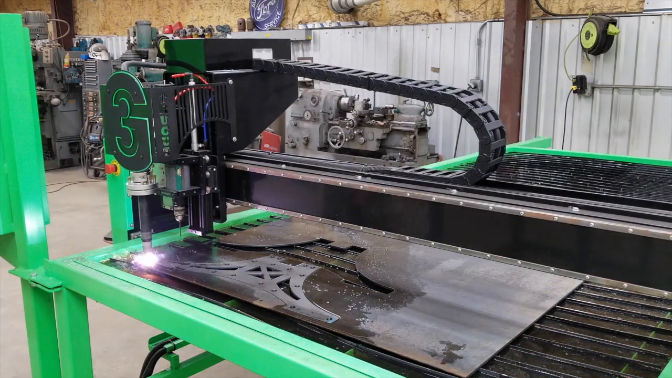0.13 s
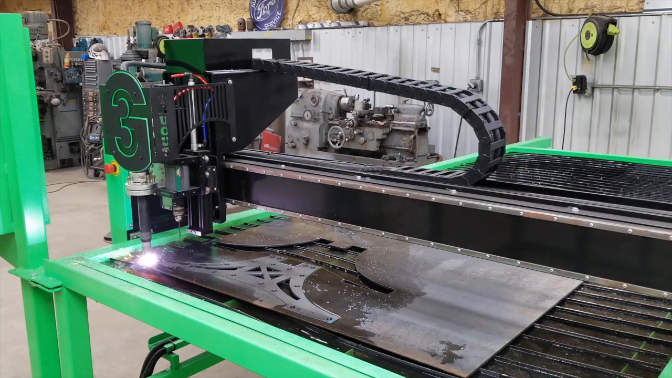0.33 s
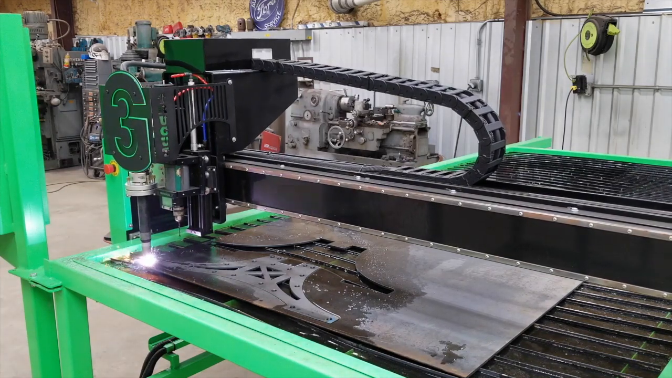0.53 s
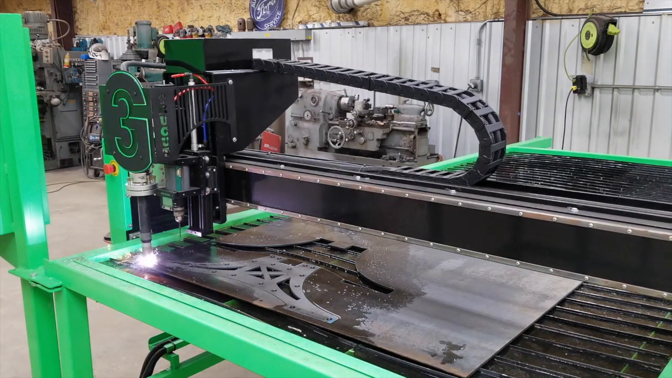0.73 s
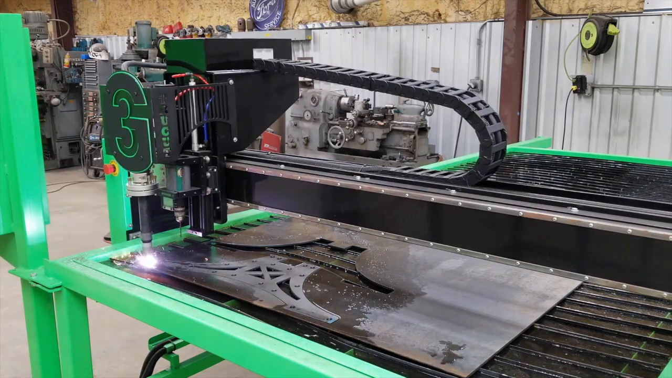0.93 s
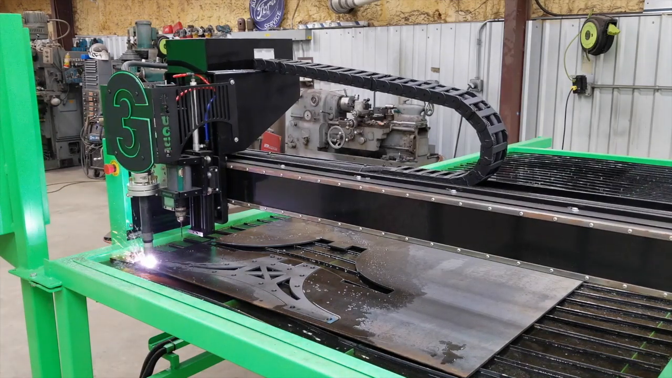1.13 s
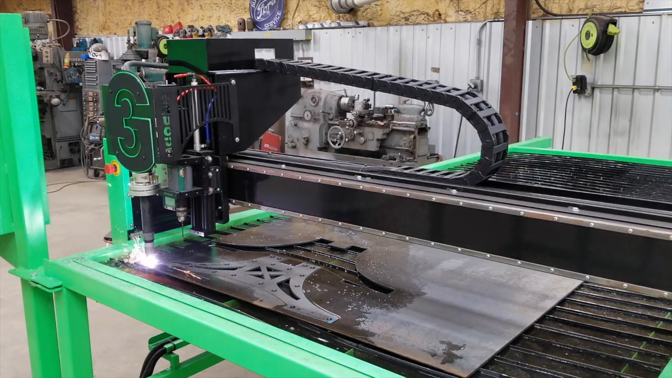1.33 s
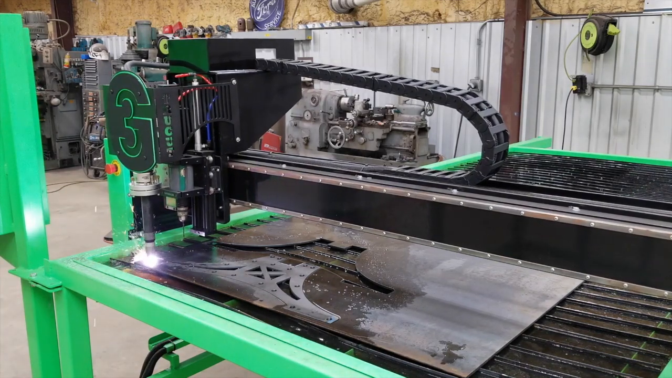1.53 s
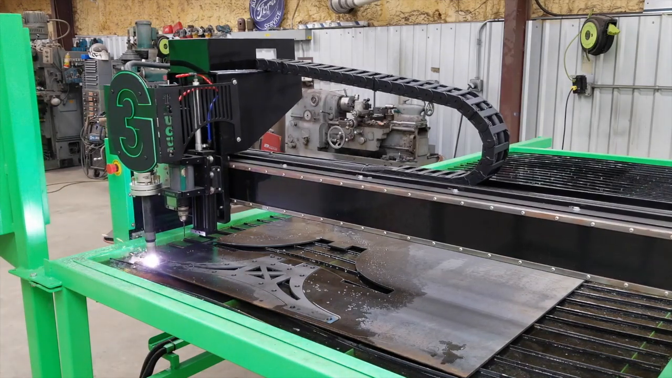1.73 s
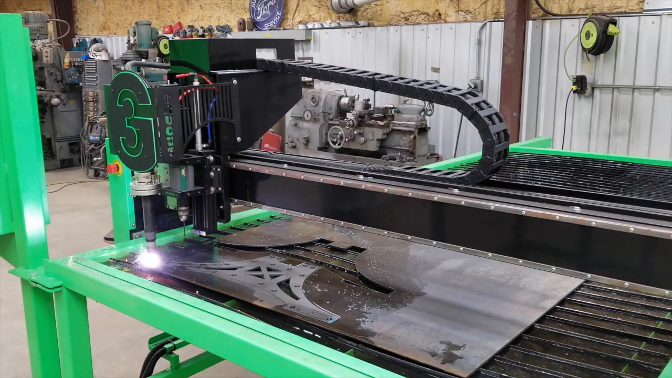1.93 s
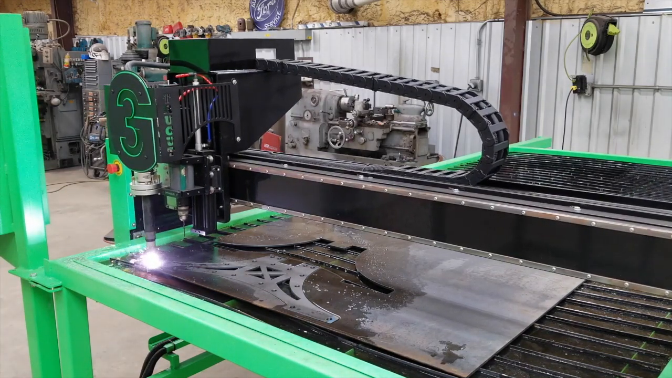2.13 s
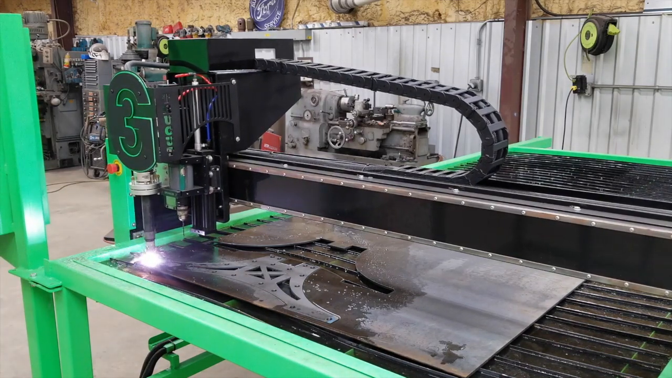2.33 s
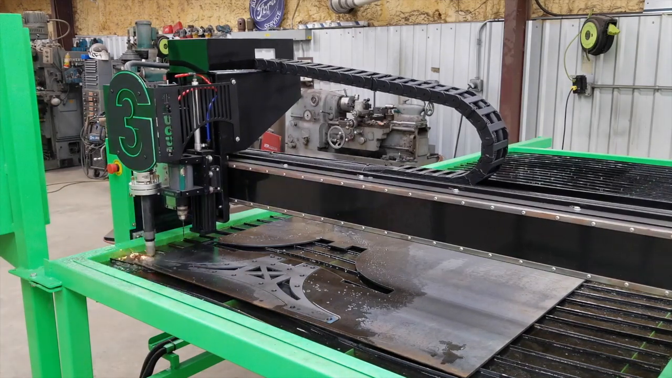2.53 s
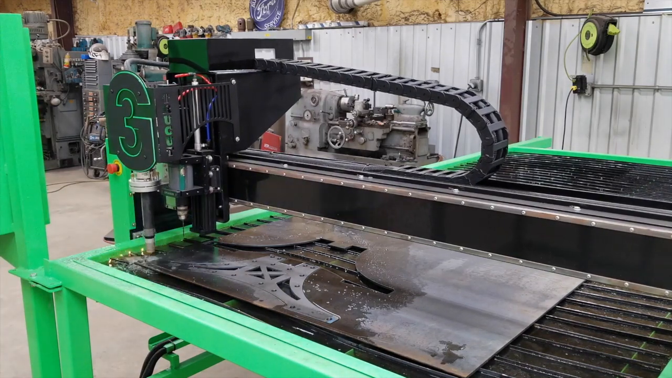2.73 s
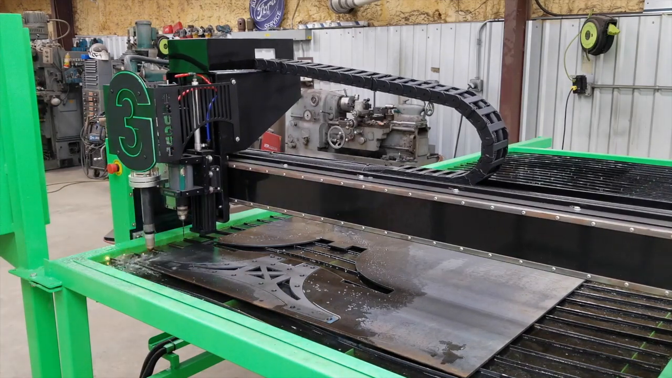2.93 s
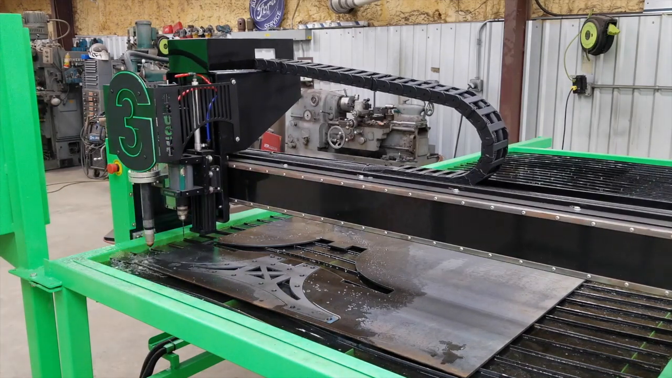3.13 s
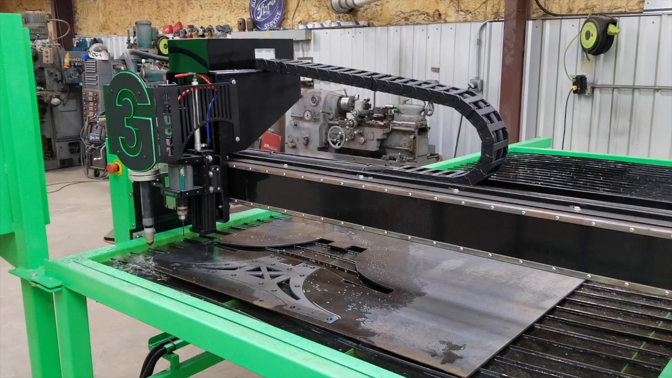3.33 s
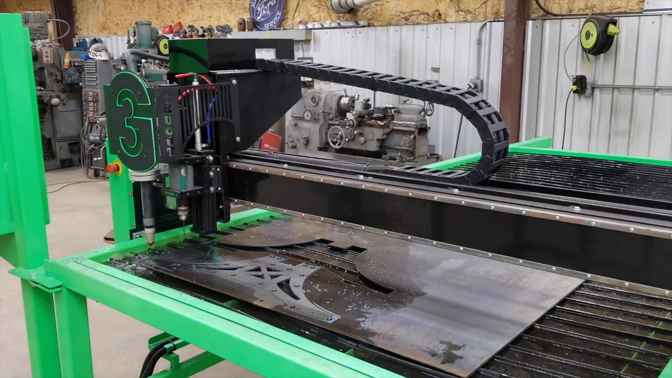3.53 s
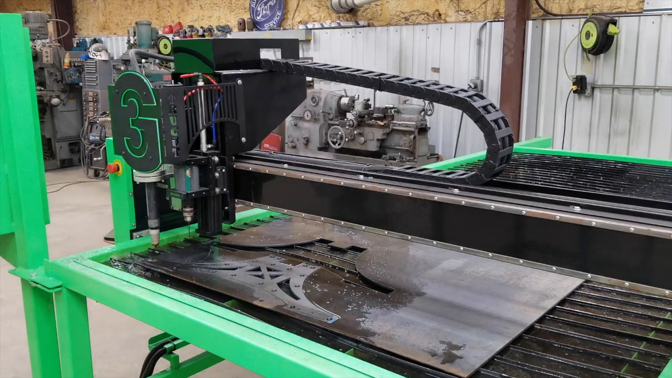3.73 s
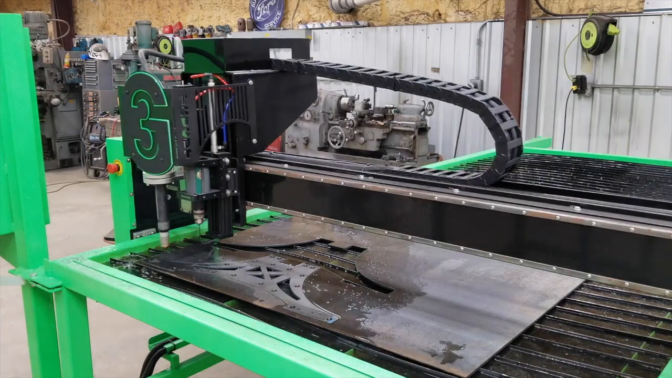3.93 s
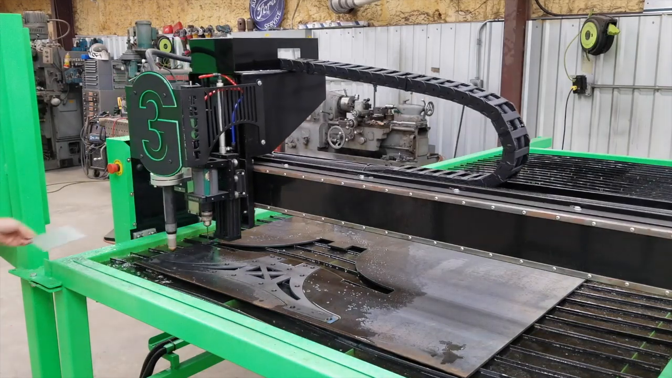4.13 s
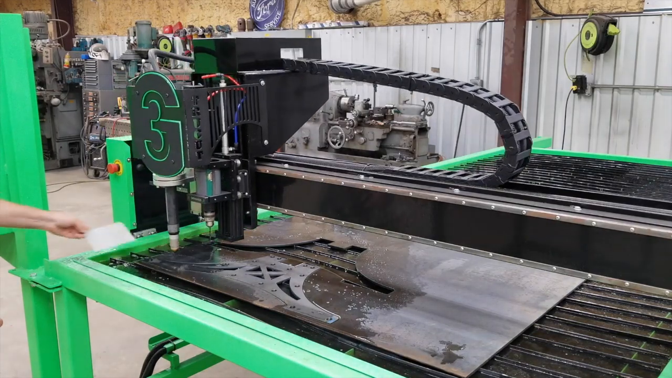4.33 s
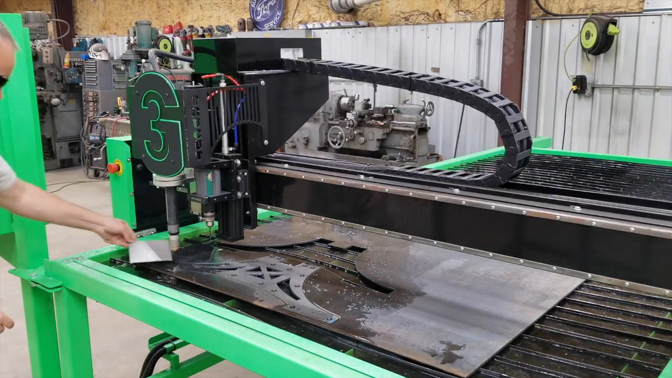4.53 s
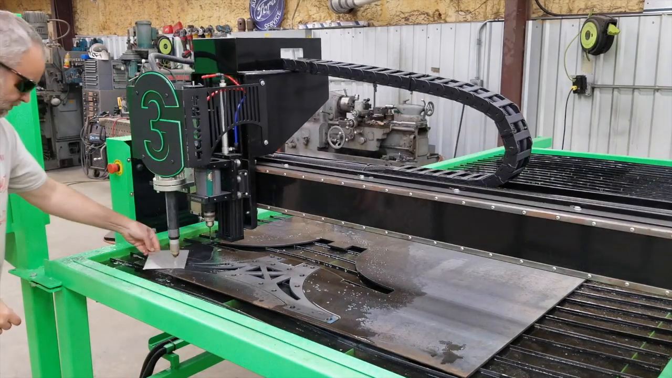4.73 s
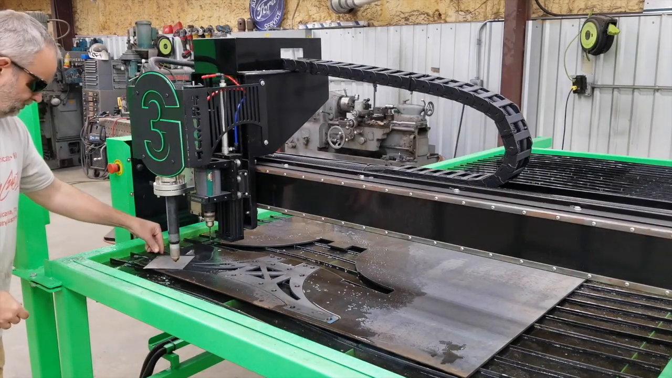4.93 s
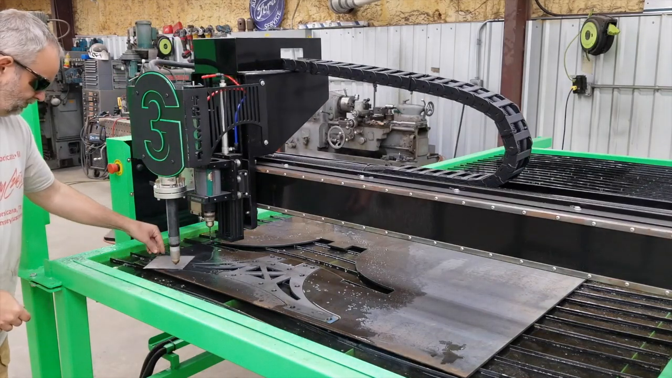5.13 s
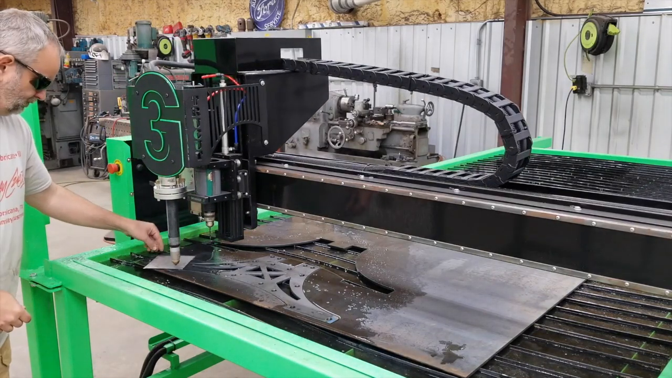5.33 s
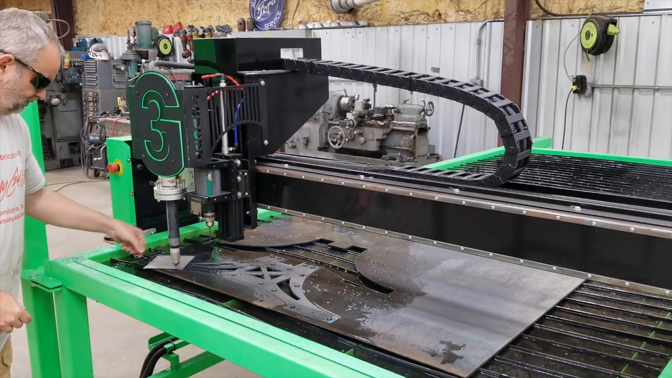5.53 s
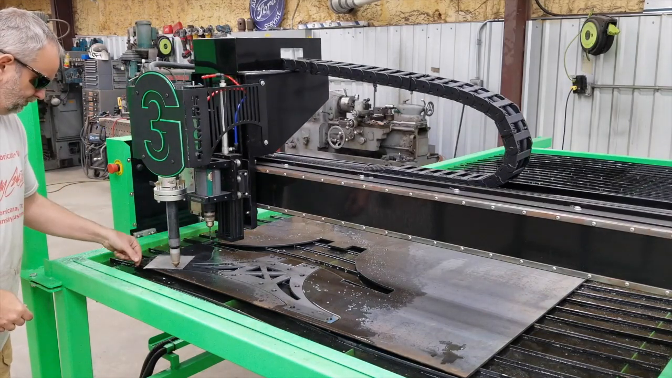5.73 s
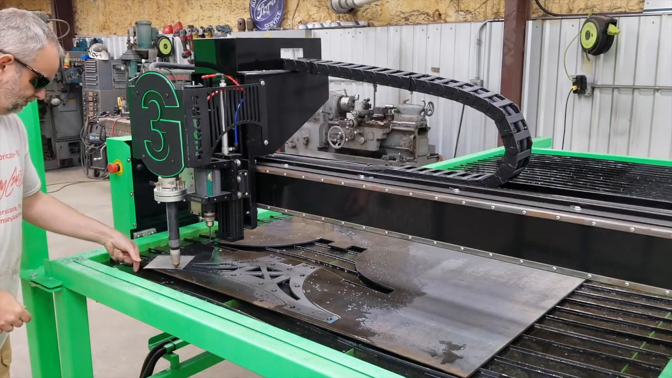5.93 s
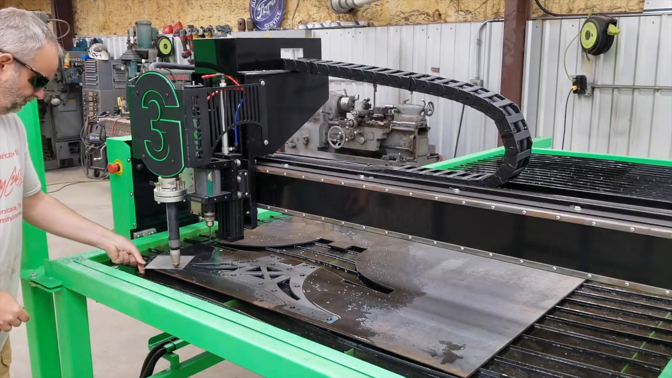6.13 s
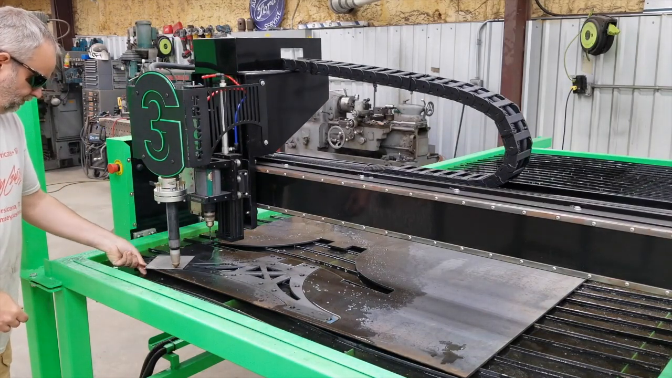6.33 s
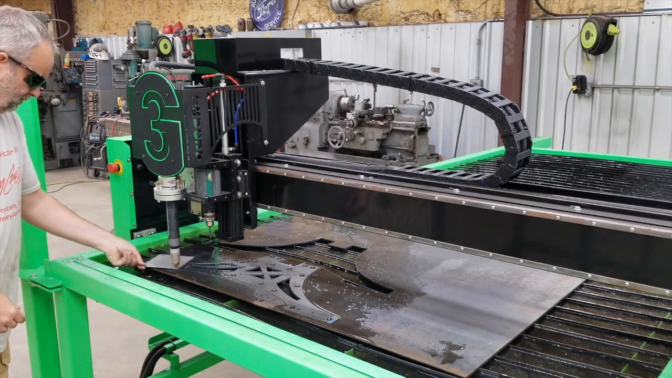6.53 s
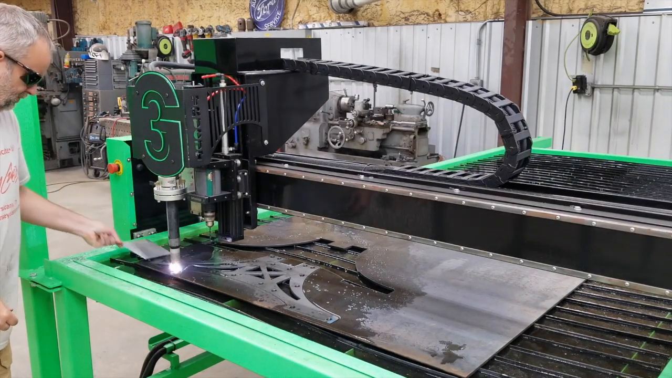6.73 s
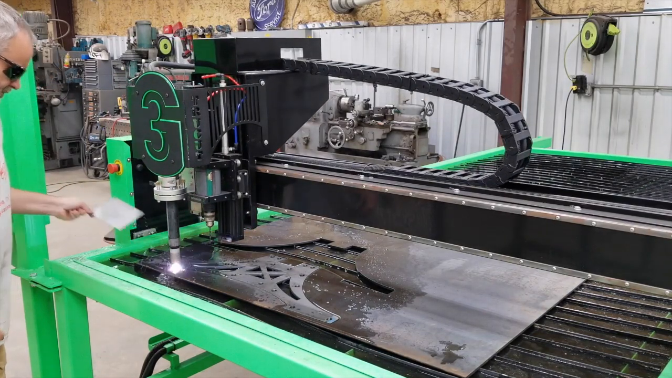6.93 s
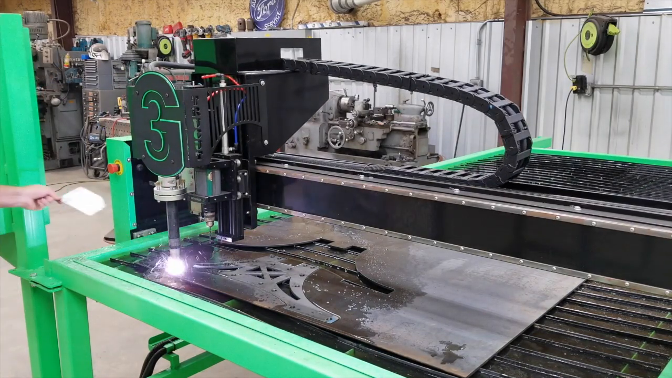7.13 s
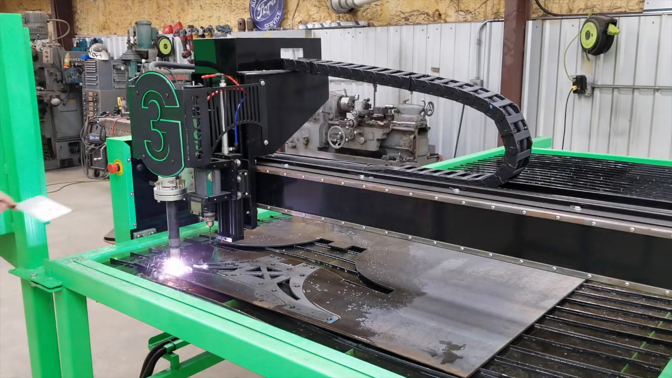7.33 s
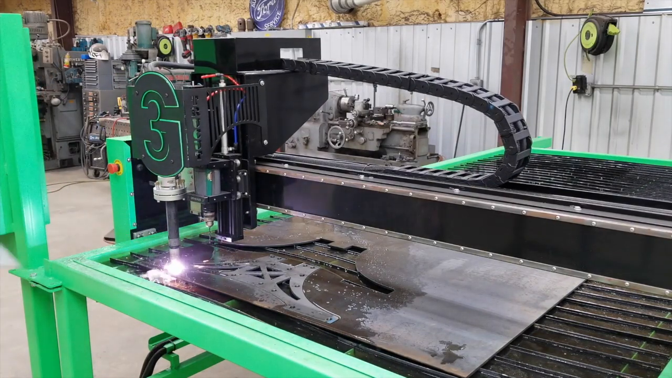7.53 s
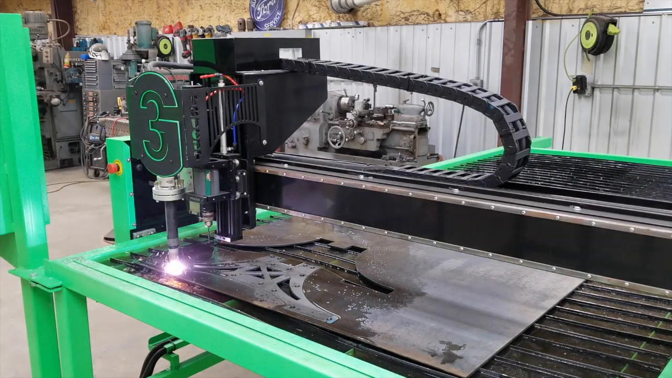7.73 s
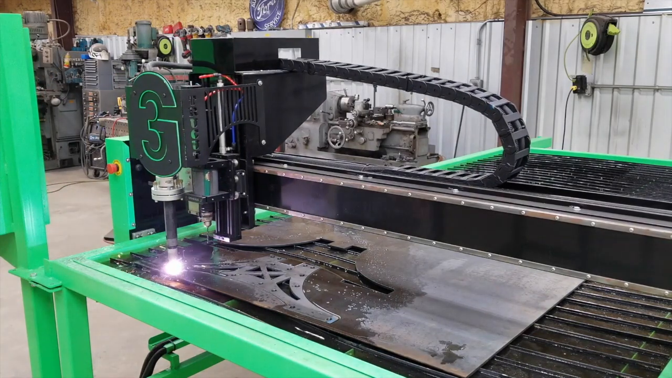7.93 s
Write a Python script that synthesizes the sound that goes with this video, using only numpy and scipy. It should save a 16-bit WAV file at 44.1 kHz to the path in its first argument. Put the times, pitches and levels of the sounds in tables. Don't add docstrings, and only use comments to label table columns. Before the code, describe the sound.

Close up in a workshop, a plasma torch cuts steel with a loud, flickering bright hiss while water churns and rings beneath the plate. The arc breaks with a pop, leaving rushing air, fizzy splashes and short whistles. Background machines rumble and whine more clearly from the right. The air cuts off briefly, then the arc strikes with a sharp snap and an even louder hiss, with crackling slag and gurgling water.

```python
import sys
import numpy as np
from scipy import signal
from scipy.fft import rfft, irfft, next_fast_len
from scipy.io import wavfile
from scipy.ndimage import uniform_filter1d

SR = 44100
rng = np.random.default_rng(int(sys.argv[2]) if len(sys.argv) > 2 else 0)


def wav_out(sig):
    wavfile.write(sys.argv[1], SR, np.round(np.clip(np.atleast_2d(sig).T, -1, 1) * 32767).astype(np.int16))


def elevation(decibels):
    levels = np.asarray(decibels, float)
    return 10 ** (levels / 20)


N = 356769
TRAVEL_S = 3.69


def evened(x):
    return x / np.sqrt(np.mean(x ** 2) + 1e-20)


def read(points, hz):
    f, value = np.transpose(points)
    return np.interp(np.log(hz + 1), np.log(f + 1), value)


def follow(rows, t):
    s, *columns = np.transpose(rows)
    return [np.interp(t, s, c) for c in columns]


def chance(t, low_hz, high_hz):
    waves = [np.sin(2 * np.pi * (f * t + rng.random())) / np.sqrt(f) for f in np.geomspace(low_hz, high_hz, 30)]
    return evened(sum(waves))


def slow_chance(low_hz, high_hz):
    t = np.arange(N) / SR
    return np.interp(t, t[::64], chance(t[::64], low_hz, high_hz))


def patchwork(shape, *widths):
    field = rng.standard_normal(shape[::-1]).T
    for width, axis in widths:
        field = uniform_filter1d(field, width, axis)
    return evened(field)


def add(mix, sound, s=0):
    part = mix[round(s * SR):][:len(sound)]
    part += sound[:len(part)]


def noise_pair(gain, same, lead, size):
    a, b, c, d = rng.standard_normal(gain.shape[::-1] + (4,)).T
    same = np.clip(same, 0, 1)
    left, other = a + 1j * b, c + 1j * d
    right = same * left * np.exp(-1j * lead) + np.sqrt(1 - same ** 2) * other
    return signal.istft(np.array([left, right]) * gain, nperseg=size, noverlap=size * 3 // 4)[1][:, :N]


def ring(x, hz, width):
    return signal.lfilter(*signal.iirpeak(hz, hz / width, SR), x)


def resonate(x, hz, width):
    turn = np.exp(2j * np.pi * np.cumsum(hz) / SR)
    r = np.exp(-np.pi * width / SR)
    return 2 * (turn * signal.lfilter([1 - r], [1, -r], x / turn)).real


def steel(x, modes, ring_db):
    return x + elevation(ring_db) * sum(elevation(db / 2) * ring(x, hz, width) for hz, width, db in modes)


# band_hz, t60_s
HALL_DECAY = [(200, 0.24), (1000, 0.2), (4000, 0.28), (12000, 0.22)]


def hall(x):
    taps = np.zeros((2, SR))
    at = np.arange(200, SR - 20, 20) + rng.integers(0, 20, (2, (SR - 201) // 20))
    np.put_along_axis(taps, at, rng.choice([-1., 1.], at.shape), 1)
    hz, t, z = signal.stft(taps, SR, nperseg=256)
    tail = signal.istft(z * elevation(-60 * t / read(HALL_DECAY, hz)[:, None]), SR, nperseg=256)[1]
    return signal.fftconvolve(x[None], tail / np.linalg.norm(tail[0]), axes=1)[:, :N]


# band_hz, level_db (per Hz)
RUMBLE_SPECTRUM = [(12, -59), (20, -70), (113, -7.5), (141, -23), (226, -6), (635, -11), (965, -2.5),
                   (1390, -47), (1690, -14), (2360, -22), (3030, -11), (3790, -13.5), (4230, -8),
                   (10300, -15.5), (15700, -61)]
# time_s, level_db
SHOP_GAIN = [
    (0, -36),
    (2.4, -32),
    (3.4, -33),
    (4.2, -28),
    (6.72, -29),
    (6.78, -42),
    (8.1, -36),
]


def shop():
    whine_hz, hum_hz, hum_on_s = 1001, 490, 4.8
    whine_on_s, whine_off_s, rise_s = 3.3, 6.72, 0.1
    whine_db, idle_db = -5, -22
    right_hz = 470
    hz, t = np.fft.rfftfreq(1024, 1 / SR)[:, None], np.arange(N) / SR
    patches = patchwork((513, N // 256 + 5), (5, 0), (12, 1))
    gain = elevation(read(RUMBLE_SPECTRUM, hz) + 0.96 * patches)
    rumble = evened(noise_pair(gain, 1.16 / (1 + (hz / 900) ** 2), -hz / right_hz, size=1024))
    wobble = slow_chance(1.5, 30)
    turn = 2 * np.pi * whine_hz * t + 0.21 * slow_chance(4.1, 40)
    whine = np.sqrt(2) * elevation(1.3 * wobble) * np.sin(turn + np.array([[0], [whine_hz / right_hz]]))
    hum_on = np.clip((t - hum_on_s) / .2, 0, 1)
    whine += elevation(-9 + 2.5 * wobble[::-1]) * hum_on * np.sin(2 * np.pi * hum_hz * t)
    running = np.clip(np.minimum((t - whine_on_s) / rise_s, (whine_off_s - t) / .05 + 1), 0, 1)
    running_db = idle_db + (whine_db - idle_db) * running
    return elevation(follow(SHOP_GAIN, t)[0]) * (rumble + elevation(running_db) * whine)


# start_s, length_s, first_hz, last_hz, peak_db
AIR_POCKETS = [(.42, 0.22, 1060, 1130, -27.5), (2.65, 0.41, 474, 485, -39.5),
               (3.45, 0.25, 1130, 1080, -29.5), (3.819, 0.29, 330, 330, -34.5),
               (4.032, 0.19, 1600, 1560, -25), (4.171, 0.089, 1610, 1180, -14),
               (4.121, 0.08, 920, 870, -25.5), (4.242, .26, 870, 740, -22.5),
               (4.4, 0.27, 1110, 1150, -24.5), (5.15, 0.58, 1730, 1920, -39.5),
               (5.7, 0.27, 1790, 1730, -38), (6.302, 0.29, 1790, 1710, -33), (6.33, 0.2, 355, 348, -36.5),
               (6.72, 0.018, 2560, 1020, -18.5), (7.052, 0.083, 1140, 810, -30),
               (7.098, 0.077, 620, 376, -30)]


def pockets():
    out = np.zeros(N)
    for s, length, first_hz, last_hz, db in AIR_POCKETS:
        u = np.arange(0, length, 1 / SR) / length
        hz = first_hz * (last_hz / first_hz) ** u
        width = 80 + 0.038 * hz.mean() + 4 / length
        breath = rng.standard_normal(SR)[:len(u)]
        song = resonate(resonate(breath, hz, width), hz, 2.9 * width)
        add(out, elevation(db) * evened(song) * np.sin(np.pi * u) ** 0.84, s)
    return out


# start_s, peak_db, ring_hz, t60_s
ARC_POPS = [
    (2.456, -8, 547, 0.029),
    (6.715, -24, 1800, 0.054),
    (6.724, -9, 2620, 0.029),
]


def pops():
    out, t = np.zeros(N), np.arange(4000) / SR
    for s, db, hz, t60 in ARC_POPS:
        crack = ring(rng.standard_normal(len(t)), 2100, 5800)
        thud = np.sin(2 * np.pi * hz * t) + 0.6 * evened(crack)
        add(out, elevation(db - 1.0 - 60 * t / t60) * np.minimum(t / 0.00099, 1) * thud, s)
    return out


# start_s, stop_s, rate_per_s, level_db
SLAG = (7, 7.5, 70, -8.5)


def spit():
    start, stop, per_s, db = SLAG
    t, age = np.arange(N) / SR, np.arange(200) / SR
    left = np.clip((stop - t) / (stop - start), 0, 1) * (t > start)
    strength = elevation(db + 3.5 * np.minimum(rng.exponential(1, N), 3))
    births = (rng.random(N) < per_s * left / SR) * strength
    crack = ring(rng.standard_normal(200), 6000, 7000) * elevation(-60 * age / 0.0026)
    return signal.oaconvolve(births, crack)[:N]


# peak_s, length_s, all_bubbles_db, small_extra_db
WATER_SURGES = [(0.26, .1, 1, 3.5), (0.397, 0.065, 2.5, -5), (0.51, 0.11, 3, 2), (.69, 0.12, -3, 6.5),
                (0.847, 0.032, 4, -3), (0.954, 0.096, -0.5, 10), (1.06, 0.16, 3.5, -1),
                (1.335, .16, 3, 6.5), (1.462, .1, 0.5, -4.5), (1.587, 0.075, 3.5, 11),
                (1.653, 0.084, -4.5, -3), (1.748, 0.12, 2, 12.5), (1.935, 0.18, -1, 11),
                (2.157, 0.14, 0.5, 10.5), (2.22, .06, 1.5, -6), (2.305, 0.083, -0.5, 7.5),
                (7.067, 0.043, 3.5, 6), (7.14, 0.063, 5, -6), (7.303, 0.073, -1.5, 1.5),
                (7.21, 0.088, 2, 7), (6.87, 0.099, 1, 2), (7.425, 0.12, 3.5, 2.5), (7.623, 0.064, -1.5, -7),
                (7.735, 0.048, 4.5, -5), (7.81, 0.066, 2, 3.5), (8.084, 0.096, 6.5, 5.5)]


def surges(t):
    s, length, all_db, small_db = np.transpose(WATER_SURGES)[:, :, None]
    bump = np.exp(-np.log(16) * ((t - s) / length) ** 2)
    return (all_db * bump).sum(0), (small_db * bump).sum(0)


def bubbles(tables, sizes, low_hz, split_hz, high_hz, per_s, spread_db, cycles, clump_db, hollow_db, hollow_width):
    t = np.arange(N) / SR
    large, small = np.zeros((2, N))
    gust = elevation(1.02 * slow_chance(5.2, 70))
    clumps = patchwork((36, N // 512 + 1), (5, 1), (3, 0))
    for hz, clump in zip(np.geomspace(low_hz, high_hz, 36), clumps):
        age = np.arange(int(3 * cycles * SR / hz)) * hz / SR
        pitch_rise = 1 + 0.0023 * age
        tone = np.sin(2 * np.pi * age * pitch_rise) * np.exp(-2.3 * age / cycles) * np.minimum(age / 1.15, 1)
        born = rng.random(N) < per_s * np.sqrt(hz / 800) / 36 / SR
        births = born * elevation(spread_db * np.minimum(rng.exponential(1, N), 4))
        births *= np.repeat(elevation(clump_db * clump), 512)[:N]
        song = evened(signal.oaconvolve(births, tone)[:N])
        add(large if hz < split_hz else small, song * elevation(read(sizes, hz)) * np.sqrt(hz))
    level_db, small_db, hollow_hz = follow(sum(tables, []), t)
    on = sum(np.clip(np.minimum(t - rows[0][0], rows[-1][0] - t) / 0.01 + 1, 0, 1) for rows in tables)
    froth = gust * (evened(large) + elevation(small_db + 3.0) * evened(small))
    hollow = evened(resonate(gust * rng.standard_normal(N), hollow_hz, hollow_width))
    return np.minimum(on, 1) * elevation(level_db) * (froth + elevation(hollow_db) * hollow)


def gurgle(rows, calm_db):
    t = np.arange(rows[0][0], rows[-1][0], .005)
    level_db, hollow_hz = follow(rows, t)
    all_db, finer_db = surges(t)
    level_db = level_db + all_db + .7 * chance(t, 3, 15)
    hollow_hz = hollow_hz + 9.5 * finer_db + 40 * chance(t, 2, 10)
    return list(zip(t, level_db, calm_db + finer_db, np.maximum(hollow_hz, 200)))


# time_s, churn_db, hollow_hz
CUT_CHURN = [
    [(0, -29.5, 577), (.3, -30, 586), (.6, -30.5, 840), (.95, -30.5, 720), (1.2, -32, 646),
     (1.75, -27, 735), (2.25, -25, 710), (2.46, -27.5, 590), (2.55, -37, 560)],
    [(6.72, -37.5, 900), (6.8, -32.5, 570), (7.2, -33, 457), (7.5, -33.5, 600), (8.09, -34, 533)],
]
CALM_SMALL = [-10, -2.5]
# start_s, stop_s, large_db, small_against_large_db, hollow_hz
SETTLING_WATER = [
    (2.5, 2.95, -44.5, 1, 480),
    (3.696, 4.055, -41.5, -0.5, 378),
    (4.784, 6.706, -39, 0, 573),
]
# bubble_hz, level_db (per Hz)
CHURN_SIZES = [(71, -66), (120, -34), (259, -7.5), (346, -7.5), (575, 2.5), (892, -3), (1100, -0.5),
               (1270, -2), (1900, -5), (3200, -11), (4160, -35), (7040, -120)]
# ring_hz, width_hz, level_db
FIRST_PLATE = [(273.4, 20, 10.5), (694, 100, -16), (1080, 100, 7.5), (1500, 78, 10), (1936, 15, -7)]
# ring_hz, width_hz, level_db
SECOND_PLATE = [(267, 54, 17.5), (397, 21, 16), (664, 41, -6), (1080, 41, -36)]


def churn():
    first, last = map(gurgle, CUT_CHURN, CALM_SMALL)
    settling = [[(a, *state), (b, *state)] for a, b, *state in SETTLING_WATER]
    froth = bubbles([first] + settling + [last], CHURN_SIZES, low_hz=110.6, split_hz=920, high_hz=3310,
                    per_s=2200, spread_db=3., cycles=13.8, clump_db=1.7, hollow_db=-4.5, hollow_width=220)
    second = np.arange(N) / SR > TRAVEL_S
    first_hole = elevation(-0.5) * steel(froth * ~second, FIRST_PLATE, ring_db=-2.5)
    return first_hole + elevation(-2.0) * steel(froth * second, SECOND_PLATE, ring_db=0.0)


def blown(start, attack, stop, db, growth):
    from_db, release_s, small_db, hollow_hz = -23, 0.11, 6, 1360
    end_db = db + growth * (stop - start - attack)
    shape = [(start, db + from_db), (start + attack, db), (stop, end_db), (stop + release_s, end_db + 1.2 * from_db)]
    return [(s, level_db, small_db, hollow_hz) for s, level_db in shape]


# start_s, attack_s, stop_s, level_db, growth_db_per_s
AIR_SPLASHES = [
    (2.62, 0.43, 3.62, -34, 7.5),
    (3.97, 0.26, 4.68, -25.5, 2),
]
# bubble_hz, level_db (per Hz)
SPLASH_BUBBLES = [(210, -40), (350, -24.5), (560, -9.5), (804, -6), (1690, -2.5), (2500, -3), (4500, -6),
                  (7000, -37)]
# ring_hz, width_hz, level_db
TRAY_MODES = [(845, 47, -20), (1140, 33, -6), (1440, 110, 0), (1670, 62, 0), (1882, 33, 7),
              (2490, 29, 20.5), (2580, 24, -10), (4640, 280, -2)]


def splash():
    froth = bubbles([blown(*row) for row in AIR_SPLASHES], SPLASH_BUBBLES, low_hz=340, split_hz=870, high_hz=7180,
                    per_s=5000, spread_db=2.0, cycles=15.8, clump_db=1.0, hollow_db=-7.5, hollow_width=280)
    return elevation(-1.5) * steel(froth, TRAY_MODES, ring_db=-5.5)


# start_s, stop_s
ARC_TIMES = [
    (-1, 2.46),
    (6.717, 9),
]


def arc_burning(t):
    return sum((a < t) & (t < b) for a, b in ARC_TIMES)


# time_s, level_db, body_db (body of the hiss against its top)
JET_STAGES = [
    [(1.75, -17, -6.5), (2.2, -15.5, -8)],
    [(2.7, -25.5, -4.5), (2.89, -19.5, -5), (3.08, -27.5, 1.5), (3.55, -27, -0.5), (3.8, -23.5, -10.5),
     (4.1, -22.5, -9), (4.25, -22.5, -2), (4.68, -22, 1), (4.95, -16, -16.5), (5.13, -23.5, -2.5),
     (6.5, -22.5, -5)],
    [(6.8, -12, -11), (6.93, -13, -5.5), (7.02, -14, -12.5), (7.35, -15, -11), (8.09, -17.5, -8)],
]


def nozzle(t):
    valve_shut_s, valve_fall_s, strike_s = 6.515, 0.11, 0.005
    leak_db, leak_body_db = -39, -4
    air_flutter = 0.23
    arc_stop_s, restrike_s = ARC_TIMES[0][1], ARC_TIMES[1][0]
    stages = np.array([follow(rows, t) for rows in JET_STAGES])
    later = np.where(t < restrike_s - strike_s, stages[1], stages[2])
    level_db, body_db = np.where(t < arc_stop_s, stages[0], later)
    gap = np.clip(np.minimum((t - valve_shut_s) / valve_fall_s, (restrike_s - t) / strike_s + .5), 0, 1)
    unsteady = air_flutter + (1 - air_flutter) * arc_burning(t)
    finer_db = surges(t)[1]
    level_db = level_db + gap * (leak_db - level_db) + unsteady * 0.63 * chance(t, 6, 20) + 0.047 * finer_db
    body_db = body_db + gap * leak_body_db + unsteady * 0.85 * chance(t, 5, 18) + 0.1 * finer_db
    return level_db, body_db


# band_hz, level_db (per Hz)
ARC_HISS = [(880, -38), (1500, -27), (1930, -10), (2280, -18), (2800, -11), (3310, -6.5), (4660, -4),
            (5240, -9), (7160, -5.5), (8790, -7), (9890, -3), (14800, 2.5), (15500, 1)]
# band_hz, level_db (per Hz)
AIR_HISS = [(880, -53), (1500, -20.5), (1840, -12), (2220, -19), (3030, -5.5), (3280, -9.5), (3610, -6.5),
            (5780, -11), (7900, -4), (9140, -5.5), (10400, -0.5), (12900, 3), (14500, 4), (15500, -0.5)]
# band_hz, likeness (0 to 1)
LIKENESS = [(200, 1), (1500, 0.54), (3000, 0.42), (5500, 0.054), (8000, 0.61), (11500, 0.16), (13000, 0.5),
            (15500, 0.74)]
# band_hz, left_lead_rad
FIRST_LEAD = [(0, 0), (800, .5), (1800, 1), (2400, 2.7), (3800, 3.5), (4500, 1.5), (6000, 0), (8000, 1.3),
              (10000, 1.7), (11000, 3.6), (16000, 8.6)]
# band_hz, left_lead_rad
SECOND_LEAD = [(0, 0), (800, .5), (2500, 1.6), (3300, 2), (3800, 2.7), (5000, 1.4), (6000, -.3), (9500, .5),
               (10300, 1), (11500, 3), (12800, 3.3), (15600, 6.3)]


def jet():
    hz, t = np.fft.rfftfreq(256, 1 / SR)[:, None], np.arange(N // 64 + 5) * 64 / SR
    flat_hz = np.minimum(hz, 15300)
    level_db, body_db = nozzle(t)
    arc = arc_burning(t)
    shape_db = np.where(arc, read(ARC_HISS, flat_hz), read(AIR_HISS, flat_hz))
    low, top = (hz > 3500) & (hz < 8500), (hz > 9000) & (hz < 15500)
    power = elevation(2 * shape_db)
    own_body_db = 10 * np.log10((power * low).sum(0) / (power * top).sum(0))
    share = 1 / (1 + (hz / 8800) ** 6)
    patches = patchwork(shape_db.shape, (5, 0), (30, 1))
    narrow_patches = patchwork(shape_db.shape, (14, 1))
    sputter = evened(uniform_filter1d(rng.standard_normal(len(t)), 4)) + 0.8 * chance(t, 10, 60)
    field_db = shape_db + share * (body_db - own_body_db - .4)
    field_db = field_db + 0.83 * patches + 3.2 * narrow_patches + (0.16 + 0.54 * arc) * sputter
    gain = elevation(field_db) / np.sqrt((power * top).sum(0))
    moved = np.clip((t - TRAVEL_S) / .6 + .5, 0, 1)
    lead_first, lead_second = np.exp(1j * read(FIRST_LEAD, hz)), np.exp(1j * read(SECOND_LEAD, hz))
    lead = np.angle((1 - moved) * lead_first + moved * lead_second)
    hiss = noise_pair(gain, read(LIKENESS, hz), lead, size=256)
    hiss *= elevation([[.3], [-.3]])
    return evened(hiss) * elevation(np.interp(np.arange(N) / SR, t, level_db) + 5.0)


def scene():
    water = churn() + splash() + pockets() + pops() + spit()
    water = signal.lfilter(*signal.butter(3, 100, "high", fs=SR), water)
    size = next_fast_len(N)
    late = np.exp(-1j * read(SECOND_LEAD, np.fft.rfftfreq(size, 1 / SR)))
    right = irfft(rfft(water, size) * late, size)[:N]
    ports = np.array([elevation(0.04) * water, elevation(-2.0) * right])
    hiss = jet()
    return hiss + elevation(-6) * hall(hiss[0]) + ports + elevation(-5.5) * hall(water) + shop()


def low_pass(x):
    return signal.sosfilt(signal.butter(12, 15750, fs=SR, output="sos"), x)


def record(dry):
    mid, side = dry.mean(0), (dry[0] - dry[1]) / 2
    side = .25 * side + .75 * signal.lfilter(*signal.butter(1, 300, "high", fs=SR), side)
    held = np.clip([mid + side, mid - side], -.95, .95)
    edge = signal.firwin(1023, 15900, window=("kaiser", 9), fs=SR)
    return low_pass(signal.oaconvolve(held, edge[None], "same"))


dry = scene()
out = record(dry)
wav_out(out)
```